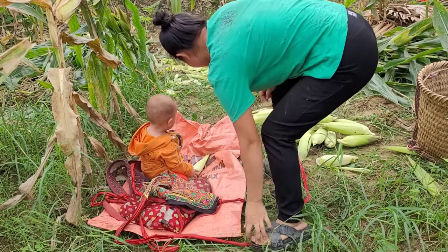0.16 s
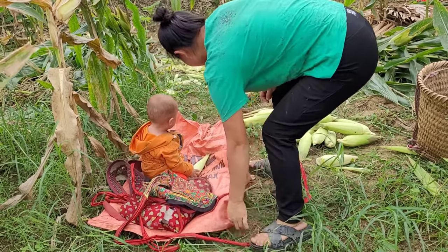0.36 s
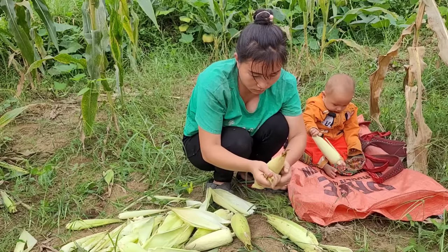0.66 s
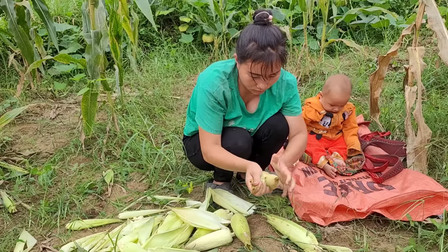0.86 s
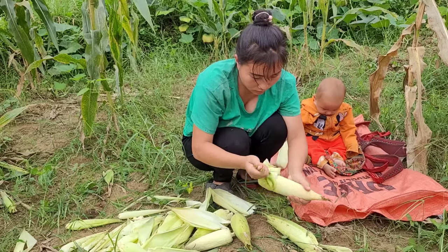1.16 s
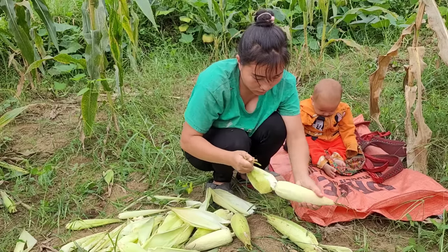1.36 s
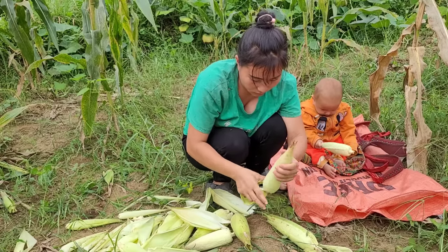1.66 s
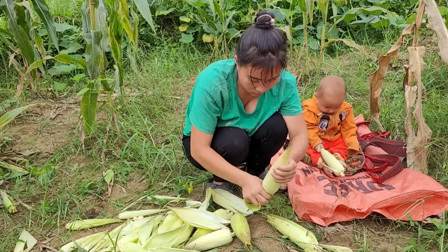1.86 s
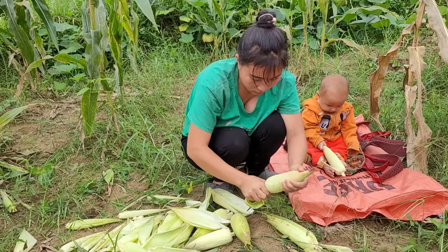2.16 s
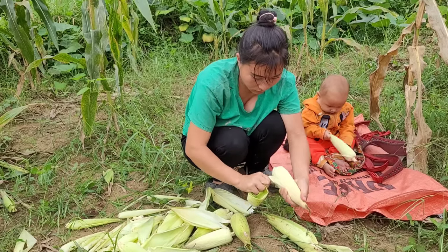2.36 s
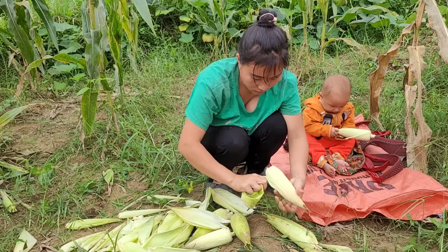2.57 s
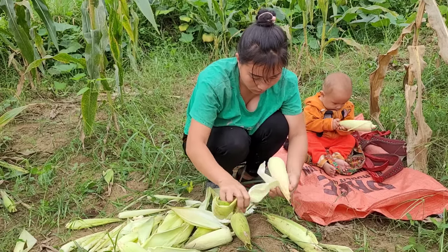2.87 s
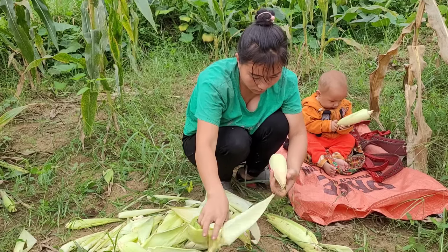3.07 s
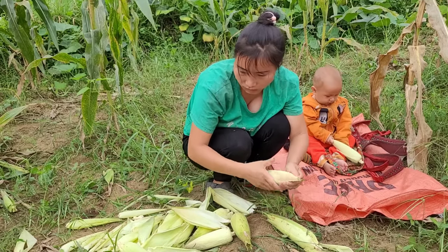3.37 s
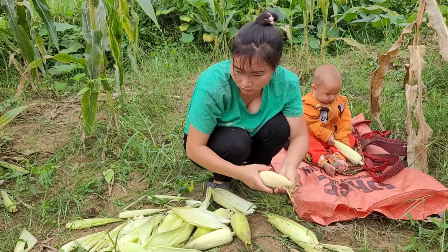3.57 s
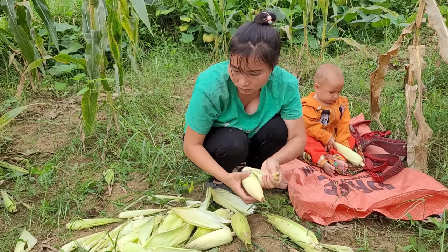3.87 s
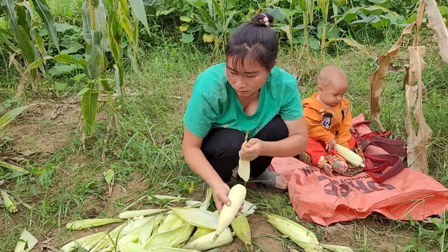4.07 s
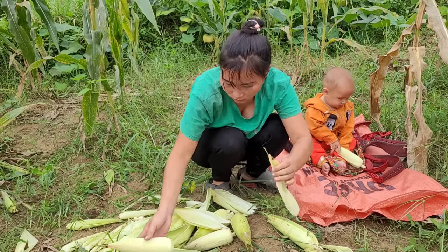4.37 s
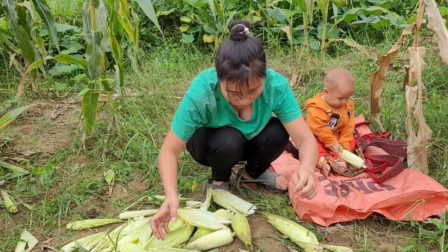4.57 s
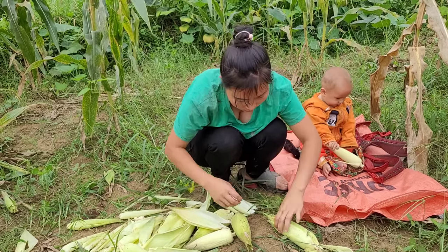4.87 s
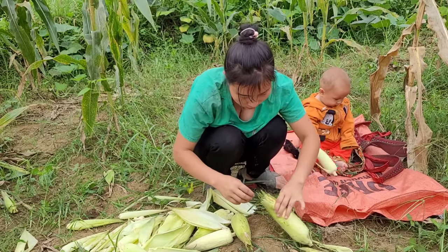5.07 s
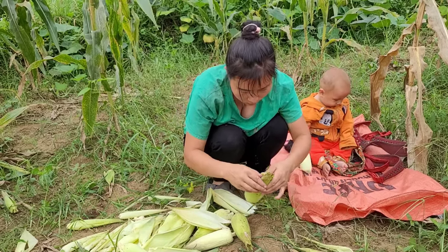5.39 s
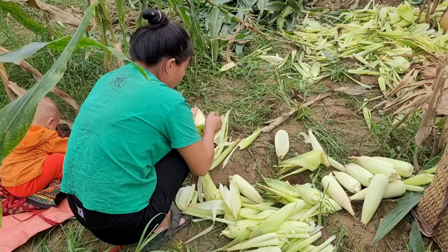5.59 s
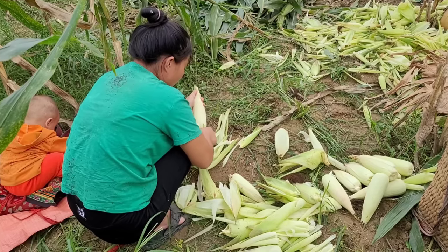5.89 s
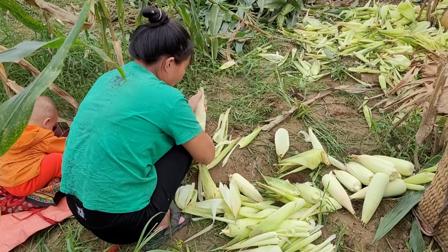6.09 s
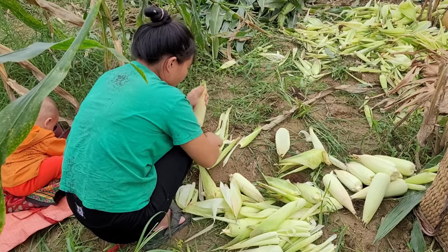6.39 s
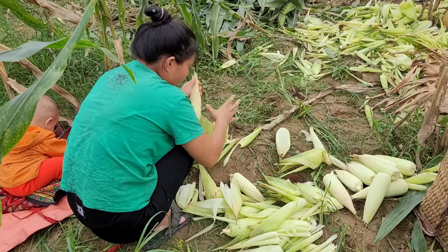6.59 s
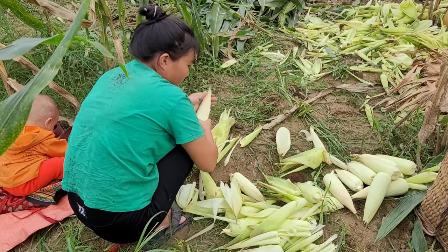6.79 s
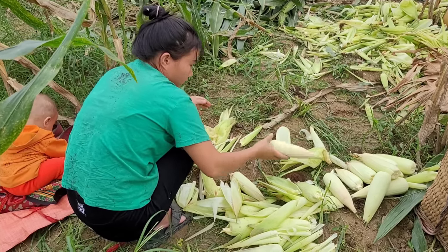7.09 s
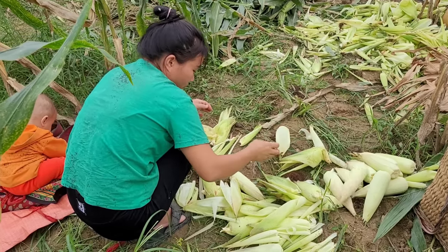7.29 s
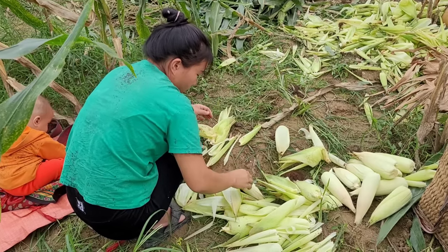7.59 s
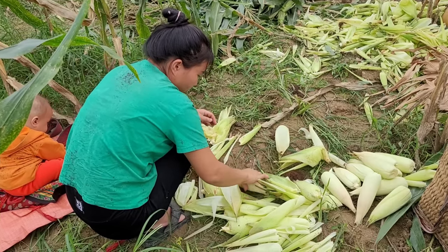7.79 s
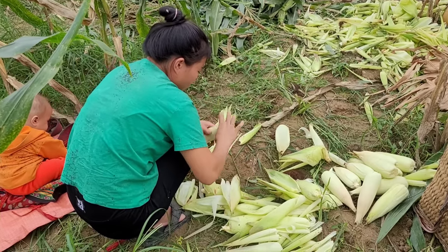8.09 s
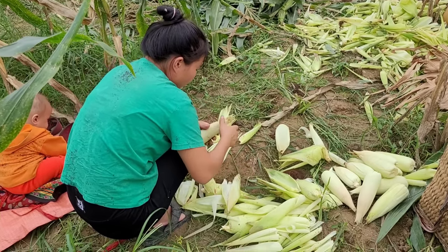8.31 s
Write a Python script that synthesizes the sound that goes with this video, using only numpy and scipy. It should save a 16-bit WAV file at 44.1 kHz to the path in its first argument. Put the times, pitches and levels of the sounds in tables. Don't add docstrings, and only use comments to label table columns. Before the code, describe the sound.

Close to a stereo microphone in an open field, green husks are stripped from corn. A faint rustle leads to a burst of loud tearing and a knock just after one second, a hard snap near 2.4, then softer rubs and pulls. After a tiny silent cut at 5.5, one sharp snap and quiet rustles follow. A cricket, small birds and wind stay faint behind.

```python
import sys
import numpy as np
from scipy import signal
from scipy.io import wavfile

SR = 44100
rng = np.random.default_rng(int(sys.argv[2]) if len(sys.argv) > 2 else 0)


def rack_gain(trim_db):
    fader = np.asarray(trim_db, float)
    return 10 ** (fader / 20)


def to_wav(s):
    ch = np.atleast_2d(s).T
    pcm = np.round(np.clip(ch, -1, 1) * 32767)
    wavfile.write(sys.argv[1], SR, pcm.astype(np.int16))


N = 372644


def rms_one(x):
    return x / np.sqrt(np.mean(x ** 2) + 1e-20)


def level_in_time(rows):
    times, levels = np.transpose(rows)
    return np.interp(np.arange(N) / SR, times, levels)


def at_hz(points, hz):
    point_hz, values = np.transpose(points)
    return np.interp(np.log(hz), np.log(point_hz), values)


def drift(rate_hz):
    step = 20
    r = np.exp(-2 * np.pi * rate_hz * step / SR)
    coarse = rng.standard_normal(N // step + 2002)
    slow = signal.lfilter([1], [1, -2 * r, r * r], coarse)[2000:]
    return np.interp(np.arange(N) / step, np.arange(len(slow)), rms_one(slow))


def band(x, low_hz, high_hz):
    sos = signal.butter(2, [low_hz, min(high_hz, .45 * SR)], "band", fs=SR, output="sos")
    return signal.sosfilt(sos, x)


def pair(alike):
    mid, side = rng.standard_normal((2, N))
    alike = np.clip(alike, -.99, .99)
    return (np.sqrt(1 + alike) * mid + np.sqrt(1 - alike) * side * [[1], [-1]]) / np.sqrt(2)


def fibres(per_s, spread_db, grain_s, smooth):
    sizes = rack_gain(spread_db * np.minimum(rng.exponential(1, N), 4))
    parted = rng.random(N) < per_s * rack_gain(5.0 * drift(25)) / SR
    puffs = signal.lfilter([1], [1, -np.exp(-1 / (grain_s * SR))], sizes * parted)
    return rms_one(smooth + rms_one(puffs))


# (time [s], length [s], crackle level [dB], body re crackle [dB], fizz re crackle [dB])
FLICKS = [(.48, 0.13, -56, 1, -11), (.6, 0.087, -49, 2, 0.5), (.785, 0.2, -57, 1, 2),
          (1.115, 0.36, -30.5, -4, -5), (1.355, 0.052, -46.5, -13, -29), (1.5, 0.21, -52.5, -5, -9),
          (3.27, 0.24, -45, -3.5, -7), (4.58, .12, -43.5, -1, -3), (4.67, 0.14, -48, -4.5, -7.5),
          (4.94, 0.67, -62.5, -4, -3), (5.6, 0.072, -51, -8, -10), (6.27, 0.16, -55.5, -4.5, -4),
          (6.495, 0.2, -47, -5.5, -9), (6.57, 0.19, -55, 1, -8), (6.75, 0.15, -48, -4, -6),
          (6.85, 0.21, -54.5, -4, -6), (7.36, 0.15, -54.5, -2, 0), (7.415, 0.67, -57, -4.5, -1),
          (7.92, .16, -63, 1.5, 2.5), (8.14, 0.12, -53.5, 0.5, -3.5)]
DRAGS = [
    (.27, .14, -53, -3, 0),
    (.99, 0.066, -38.5, -1.5, 0),
    (1.19, 0.1565, -27, 3.5, -9),
    (2.72, 0.13, -37.5, -12, 0.5),
    (3.88, 0.2762, -39, -1.5, -6.5),
    (6.38, 0.13, -59, -2, -3.5),
    (7.76, 0.197, -58.5, 0, 1.5),
]
RUBS = [
    (1.63, 0.3, -57.5, -4.5, -3.5),
    (1.95, 0.31, -64, -8, -0.5),
    (2.78, 0.19, -39, -11, -4.5),
    (2.92, 0.19, -44, -12.5, -3.5),
    (3.08, .24, -50, -6, -5.5),
    (3.54, 0.281, -53, -2.5, -4),
    (5.235, 0.12, -51, 5, -1),
    (5.34, 0.17, -69.5, 3, 0),
    (5.79, 0.36, -61, -1.5, -3.5),
]


def strokes():
    out = np.zeros((3, N + SR))
    # (table, attack [s], change over the stroke [dB], release [s])
    hands = ((FLICKS, .026, -24.5, .038), (DRAGS, .03, 19.2, .042), (RUBS, .06, -3, .055))
    for rows, attack_s, change_db, release_s in hands:
        for s, length, db, body_db, fizz_db in rows:
            t = np.arange(round(length * SR)) / SR
            fade = np.minimum(np.minimum(t / attack_s, (length - t) / release_s), 1)
            shape = rack_gain(change_db * t / length - max(change_db, 0)) * fade
            gain = rack_gain(db + 2.5 + np.array([[body_db], [0], [fizz_db]]))
            start = round(s * SR)
            out[:, start:start + len(t)] += gain * shape
    return out[:, :N]


# (time [s], crackle peak [dB], body re crackle [dB], fizz re crackle [dB])
RIPS = [(.9615, -32, -13, -11), (1.037, -35.5, -4.5, 1), (1.123, -31.5, -21, 4), (1.1475, -14.5, -11, -6.5),
        (1.187, -20.5, -2.5, 1), (1.2391, -14.5, -0.5, -4), (1.2554, -23, -1, -15), (1.2685, -15, 7.5, -3),
        (1.2816, -25, -7, -8), (1.294, -23.5, 1.5, -4), (1.3078, -15.5, -0.5, -12), (1.3178, -16, -33, -3),
        (1.9047, -22.5, -9, 5.5), (2.3756, -14.5, 4, -10), (2.3826, -9.5, -2.5, -5.5),
        (2.3877, -14, -7.5, -5), (2.4064, -30.5, -1.5, 2), (2.8627, -22.5, -4.5, -4), (2.924, -33, 3, 6.5),
        (3.153, -33.5, -20, -14), (3.2883, -34, 3, -9.5), (4.105, -28, -22, -0.5), (4.5531, -29, -6.5, -14),
        (4.5671, -23.5, -12, -5.5), (5.6065, -32, -9.5, -13.5), (6.0537, -33, -5.5, -1),
        (6.2161, -9, -3, -10), (7.3471, -30.5, -2, -5), (7.496, -35, -7.5, -2.5)]
TICKS = [(.5462, -49, -21, 2), (.6214, -44.5, 2.5, -8), (.8916, -42, -17, 1), (1.05, -28, -11.5, 3.5),
         (1.7072, -36.5, -8, -7), (1.7973, -45, 8, -3), (1.809, -34, -3.5, -2.5), (2.008, -40.5, -9, -18.5),
         (2.0482, -35, -9, -5.5), (2.0807, -43, -17, -3), (2.154, -36.5, -10, 0), (3.2074, -39.5, -7, -18),
         (4.7157, -40, -1.5, -19.5), (4.969, -42.5, -19, -21.5), (5.449, -53, -11.5, -1),
         (5.8472, -40.5, 5.5, -3.5), (6.0916, -42, -14, -10), (6.4538, -43.5, -1, -24),
         (6.4991, -43, -16, -13), (6.6341, -46, 5, -3), (6.8726, -41.5, -2.5, -21.5),
         (7.3373, -40.5, -11, -12.5), (7.429, -35.5, -21, 5.5), (7.6336, -41.5, -1, 2),
         (7.684, -51.5, -20, 3), (7.7136, -52, -28, 0), (7.921, -37.5, -3, -4), (8.1574, -44.5, 0, -15.5)]


def snap_envelopes(rise_s, crack_s, tail_db, tail_times, pan_db):
    out, t = np.zeros((3, 2, N + SR)), np.arange(SR // 4) / SR
    # (table, decay by 60 dB [s], first crack over the decay [dB])
    for rows, t60, crack_db in ((RIPS, .054, 9), (TICKS, .054, 0)):
        crack = rack_gain(crack_db) * np.exp(-t / crack_s)
        tail = rack_gain(tail_db - 60 * t / (tail_times * t60))
        shape = (crack + rack_gain(-60 * t / t60) + tail) * np.minimum(t / rise_s, 1)
        for s, db, body_db, fizz_db in rows:
            zone_db = np.array([[body_db], [0], [fizz_db]])
            gain = rack_gain(db - 8.5 + zone_db + np.array([.5, -.5]) * pan_db)
            start = round(s * SR)
            out[:, :, start:start + len(t)] += gain[:, :, None] * shape
    return out[:, :, :N]


# (frequency [Hz], density [dB per Hz])
HUSK = [(250, -15.5), (500, -24), (850, -9.5), (1100, -18), (1350, -5), (2200, -10), (3300, -4.5),
        (4600, -9.5), (5800, -7.5), (7500, -6.5), (9000, -9), (12000, -7), (15500, -13)]
# (low [Hz], high [Hz], left-right likeness [0-1])
ZONES = [(250, 2800, .85), (2800, 7500, .5), (7500, 16200, .45)]
# (centre [Hz], width [Hz], share [0-1], from [s], to [s])
LEAF_RINGS = [
    (4580, 880, 0.47, -0.5, 6.1),
    (1940, 280, 0.32, 0, 3.7),
    (5550, 1700, 0.98, 7, 8.45),
]


def husks(patchy_db, treble_lag_s, body_lag_s):
    rub = strokes()[:, None] * rack_gain(np.array([[-.8], [.8]]))
    rub = rub * fibres(per_s=1500, spread_db=5.0, grain_s=.001, smooth=1.6)
    snap = snap_envelopes(rise_s=.0005, crack_s=.00069, tail_db=-13.0, tail_times=2.66, pan_db=-1.0)
    snap = snap * fibres(per_s=600, spread_db=8.5, grain_s=.00024, smooth=6.6)
    leaf = np.zeros((2, N))
    for (low_hz, high_hz, alike), push in zip(ZONES, np.hypot(rub, snap)):
        count = round(3 * np.log2(high_hz / low_hz))
        edges = np.geomspace(low_hz, high_hz, count + 1)
        gains = rack_gain(at_hz(HUSK, np.sqrt(edges[1:] * edges[:-1])))
        gains = gains / np.sqrt(np.sum(gains ** 2 * np.diff(edges)) * 2 / SR)
        drive = pair(alike) * push + 1e-18
        zone = np.zeros((2, N))
        for k, (gain, low, high) in enumerate(zip(gains, edges, edges[1:])):
            glint = rack_gain(patchy_db * drift(36) + .7 * drift(3.5))
            zone += gain * glint * band(drive, low, high) * (-1) ** k
        if low_hz > 2000:
            zone[1] = np.roll(zone[1], round(treble_lag_s * SR))
        else:
            zone[0] = np.roll(zone[0], round(body_lag_s * SR))
        leaf += zone
    t, rings = np.arange(N) / SR, np.zeros((2, N))
    for hz, width, share, start_s, end_s in LEAF_RINGS:
        heard = (t >= start_s) * (t < end_s)
        rings += share * rack_gain(1.5 * drift(4.0)) * heard * band(leaf, hz - width / 2, hz + width / 2)
    return leaf + rings


# (time [s], peak level [dB], pitch [Hz], puff re ring [dB], tap re ring [dB])
KNOCKS = [(1.241, -5.5, 1265, -11, -23), (2.383, -19.5, 770, 5, 16), (3.288, -41.5, 800, 9, 2.5),
          (4.568, -32.5, 233, 15, 20.5), (4.962, -47, 223, 8, 10), (5.806, -30, 1000, -16, -9),
          (5.849, -37.5, 274, 5, -3), (6.082, -43, 370, 10, 15), (6.217, -24, 323, 4.5, 16),
          (6.370, -30.5, 1010, -27, -18), (6.5425, -25.5, 260, 5.5, 22), (7.339, -34.5, 310, 6, -7),
          (7.351, -21, 230, 1, 10)]


def knocks(contact_s, tap_s):
    out, t = np.zeros(N + SR), np.arange(SR // 5) / SR
    tap = band(np.exp(-((t - .001) / tap_s) ** 2) + 1e-18, 350, 2400) * .3
    for s, db, hz, puff_db, tap_db in KNOCKS:
        t60 = .018 + 7.0 / hz
        decay = rack_gain(-60 * t / t60) * (1 - np.exp(-t / contact_s))
        ring = np.sin(2 * np.pi * hz * t) * decay
        puff = band(rng.standard_normal(len(t)) * decay ** .57, 80, 700) * rack_gain(puff_db)
        start = round(s * SR)
        out[start:start + len(t)] += rack_gain(db) * (ring + puff + tap * rack_gain(tap_db))
    pan_db = np.where(np.arange(N) / SR < 5.56, -5.5, -6)
    return out[:N] * rack_gain(np.array([[.5], [-.5]]) * pan_db)


# (start [s], length [s], level [dB])
STROKES = [
    (0, .013, 6.5),
    (0.012, 0.017, -1.5),
    (0.022, 0.014, -18),
]


def cricket(tone_hz, sag_hz):
    beats_per_s, first_beat_s = 23.713, .702
    start_s, end_s = .51, 5.13
    t = np.arange(N) / SR
    since = (t - first_beat_s) % (1 / beats_per_s)
    gate = np.zeros(N)
    for s, length, db in STROKES:
        gate += rack_gain(db) * np.sin(np.pi * np.clip((since - s) / length, 0, 1)) ** .13
    hz = tone_hz - sag_hz * since * beats_per_s + 50 * drift(120)
    phase = 2 * np.pi * np.cumsum(hz) / SR
    flutter_db = drift(30) + 1.8 * drift(150)
    soft_start_db = 4.5 * np.exp(start_s - t)
    level = rack_gain(-57 - soft_start_db + 1.1 * drift(1.5) + flutter_db) * gate
    level = level * (t > start_s) * (t < end_s)
    return level * np.array([np.sin(phase) * rack_gain(-4.5), np.sin(phase + 1.6) * rack_gain(4.5)])


# (time [s], length [s], start pitch [Hz], end pitch [Hz], level [dB])
CHIRPS = [
    (2.28, 0.026, 5400, 6900, -55),
    (2.294, 0.024, 7040, 5270, -48),
    (4.949, 0.029, 6130, 6200, -52.5),
    (5.923, 0.14, 10600, 10500, -67),
    (6.022, 0.12, 11900, 11000, -53),
    (6.277, .03, 5800, 4870, -63),
    (6.997, 0.078, 5000, 6640, -66),
    (7.29, 0.046, 5730, 5500, -65.5),
    (7.56, 0.043, 5940, 5500, -71),
    (7.823, 0.026, 5600, 4800, -54),
]


def birds(blur_hz):
    out = np.zeros(N + SR)
    for s, length, start_hz, end_hz, db in CHIRPS:
        u = np.linspace(0, 1, round(length * SR))
        arch = 1 + .045 * np.sin(np.pi * u)
        hz = (start_hz + (end_hz - start_hz) * u) * arch
        note = np.sin(2 * np.pi * np.cumsum(hz) / SR) * np.sqrt(np.sin(np.pi * u).clip(0))
        start = round(s * SR)
        out[start:start + len(u)] += rack_gain(db + 4) * note
    return out[:N] * np.array([.3 + drift(blur_hz), .3 + drift(blur_hz)])


# (time [s], level [dB])
CHORUS = [(0, -76), (.6, -68), (.8, -70), (5.5, -71), (5.6, -71), (6.7, -63.5), (8.45, -70)]


def chorus(low_hz, high_hz):
    shimmer_db = 2.5 * drift(35)
    blur = band(band(pair(0), low_hz, high_hz), low_hz, high_hz)
    return rack_gain(level_in_time(CHORUS) + shimmer_db) * rms_one(blur)


# (frequency [Hz], likeness [0-1])
LIKENESS = [(40, .88), (130, .88), (290, .7), (640, .4), (1400, .05), (15000, 0)]


def air_noise(spectrum, low_hz, high_hz, patchy_db, gust_db, count):
    out, edges = 0, np.geomspace(low_hz, high_hz, count + 1)
    for low, high in zip(edges, edges[1:]):
        hz = np.sqrt(low * high)
        level = rack_gain(at_hz(spectrum, hz) + patchy_db * drift(3.7))
        out = out + level * band(pair(at_hz(LIKENESS, hz)), low, high)
    return rms_one(out * rack_gain(gust_db * drift(5)))


# (time [s], level [dB])
WIND = [(0, -37), (.54, -42), (.66, -39.5), (.73, -52.5), (.87, -45), (1.3, -42), (1.74, -51),
        (1.86, -42.5), (2.7, -49), (3.1, -45.5), (3.75, -50), (5.15, -46), (5.41, -39.5), (5.55, -54),
        (5.79, -38.5), (6.07, -50), (6.47, -45), (8.45, -46)]
# (frequency [Hz], density [dB per Hz])
RUMBLE = [(13, -38), (22, -28.5), (48, 0), (73, -1), (153, -15), (195, -24.5), (252, -21), (400, -33),
          (520, -64), (880, -120)]


def wind():
    return rack_gain(level_in_time(WIND)) * air_noise(RUMBLE, low_hz=23, high_hz=333, patchy_db=1.5, gust_db=1.4, count=7)


# (time [s], level [dB])
MURMUR = [(0, -56), (.7, -60.5), (1.46, -61.5), (2.4, -69), (3.3, -61.5), (4.5, -62), (5.3, -59),
          (6.4, -56.5), (8.45, -61)]
# (frequency [Hz], density [dB per Hz])
FIELD = [(300, -12.5), (500, -10.5), (1000, -4), (1400, -19), (2400, -21.5)]


def murmur():
    noise = air_noise(FIELD, low_hz=272, high_hz=2540, patchy_db=2.0, gust_db=-.77, count=7)
    return rack_gain(level_in_time(MURMUR)) * noise


# (frequency [Hz], density [dB per Hz])
HISS = [(1200, -7), (2800, -6.5), (3400, -2), (4600, -7.5), (7000, -3.5), (9000, -10.5), (12000, -8),
        (15500, -10)]


def hiss():
    return rack_gain(-62.5) * air_noise(HISS, low_hz=1201, high_hz=16210, patchy_db=1.2, gust_db=1.1, count=10)


def scene():
    near = husks(patchy_db=3.0, treble_lag_s=.0002382, body_lag_s=.00007) + knocks(contact_s=.00046, tap_s=.00016)
    animals = cricket(tone_hz=7200, sag_hz=114) + birds(blur_hz=160) + chorus(low_hz=7300, high_hz=7900)
    air = (wind() + murmur() + hiss()) * rack_gain(np.array([[-1.1], [1.1]]))
    return near + animals + air


def band_limit(x):
    return signal.sosfilt(signal.butter(12, 16650, fs=SR, output="sos"), x)


# (low [Hz], high [Hz], depth [0-1])
DIPS = [
    (2850, 4090, 0.5),
    (8550, 8700, 0.7),
]
# (time [s], gain [dB])
SPLICE = [(5.5305, -2.5), (5.5325, -31), (5.552, -41), (5.556, -95), (5.568, -90), (5.578, -18),
          (5.59, -1.5)]


def record(dry):
    for low_hz, high_hz, depth in DIPS:
        b, a = signal.butter(1, [low_hz, high_hz], "band", fs=SR)
        dry = dry - depth * signal.lfilter(b, a, dry)
    top_cut = signal.cheby2(14, 40, 15950, fs=SR, output="sos")
    mix = signal.sosfilt(top_cut, dry) * rack_gain(level_in_time(SPLICE))
    return band_limit(mix)


dry = scene()
out = record(dry)
to_wav(out)
```